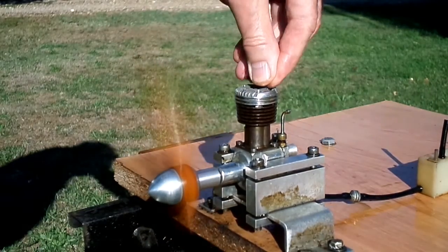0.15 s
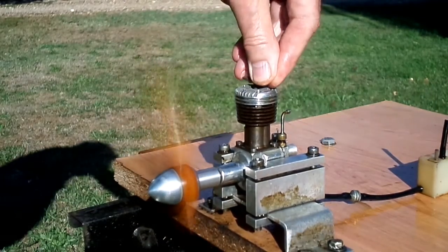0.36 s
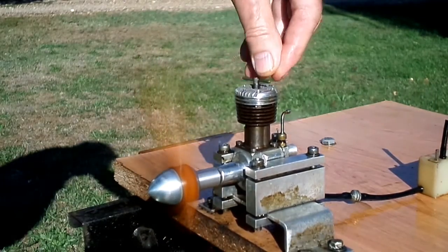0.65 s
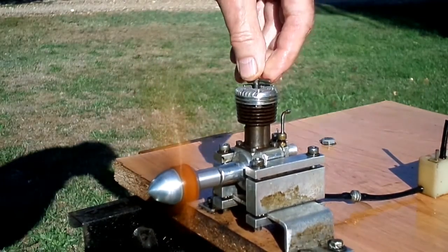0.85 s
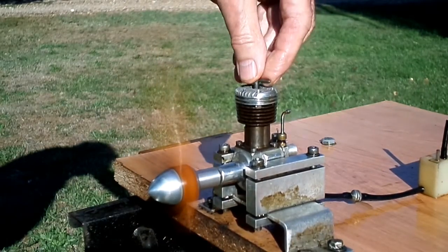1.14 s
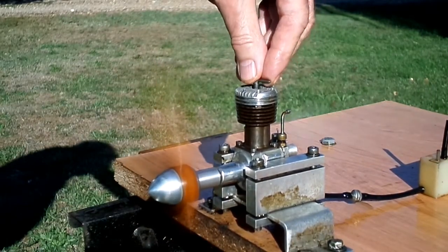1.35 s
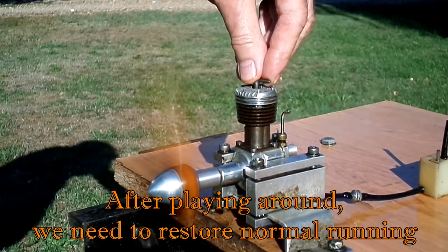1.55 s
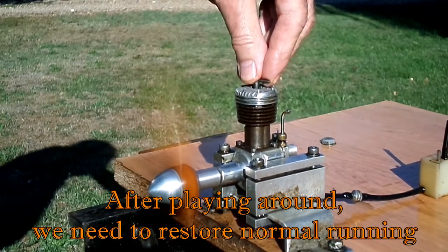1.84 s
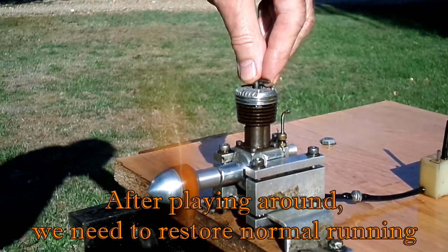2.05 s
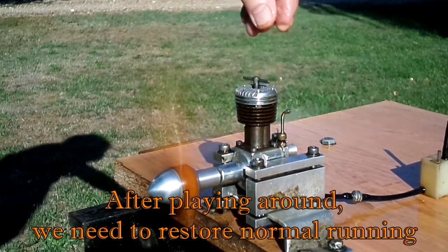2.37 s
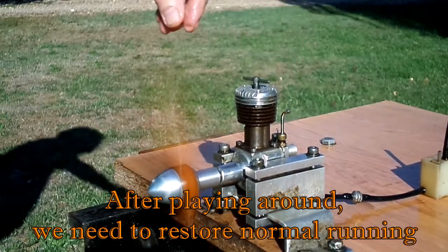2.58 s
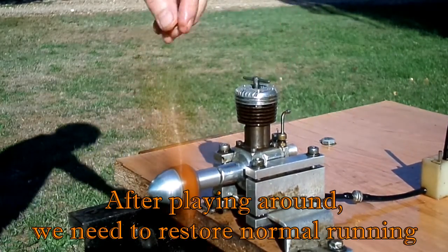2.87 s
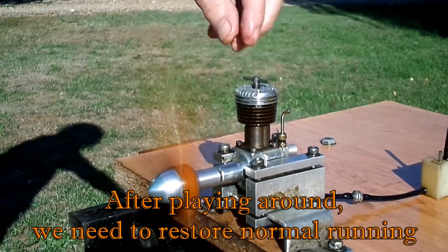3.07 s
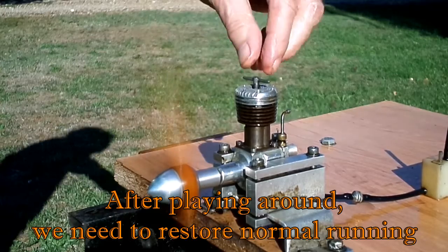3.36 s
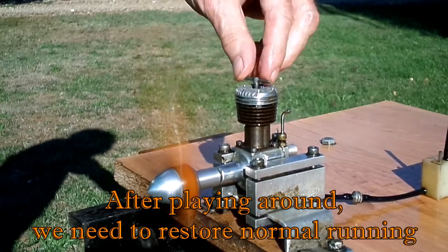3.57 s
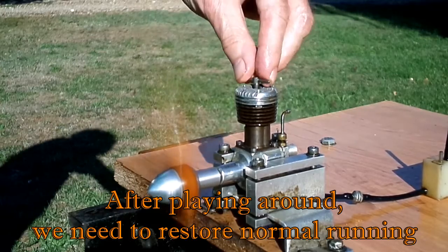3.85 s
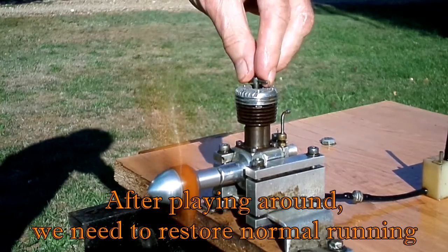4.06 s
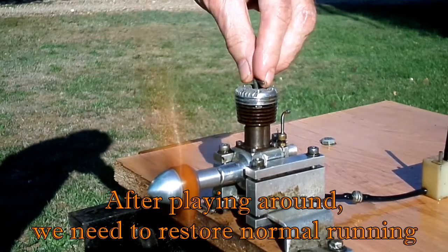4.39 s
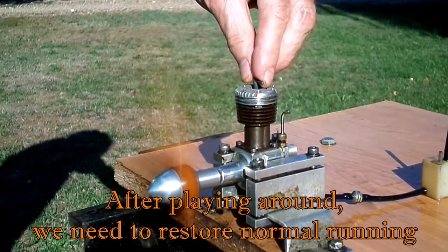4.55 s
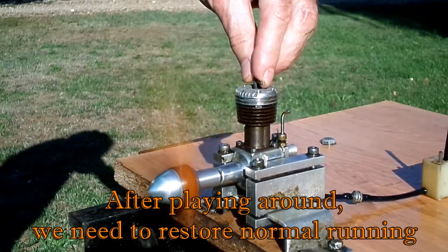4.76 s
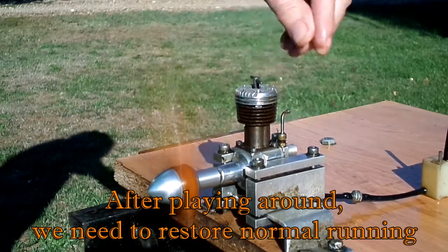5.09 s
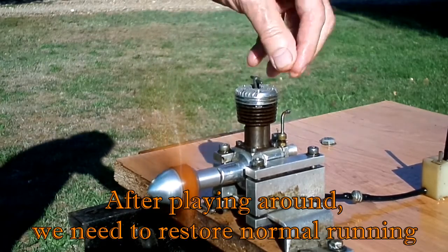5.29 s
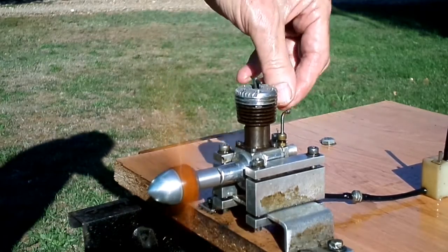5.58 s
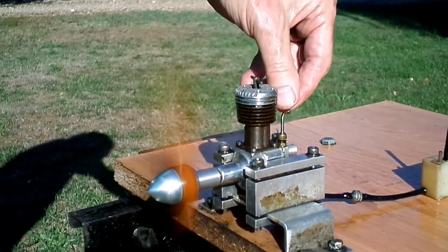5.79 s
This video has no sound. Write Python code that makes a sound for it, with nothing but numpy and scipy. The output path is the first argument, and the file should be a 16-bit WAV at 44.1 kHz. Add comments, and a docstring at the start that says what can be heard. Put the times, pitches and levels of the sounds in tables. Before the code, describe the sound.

Close by in the open air, a little model engine drones with a harsh, rattling buzz and a rush of propeller air. It quickly turns rough, repeatedly missing, sagging and catching with a sharp knock, while its hollow tone shifts slightly. In the last two seconds the stumbling stops and the engine picks up a little speed, running bright and even.

```python
"""A small two-stroke model diesel runs on a bench outdoors while a hand turns its compression screw.
From the start, over the hum and hiss of the propeller, each turn gives a combustion knock, then a sharp
exhaust pop, which the ground and the moving hand reflect. For four seconds the engine burns roughly:
now and then it misses, slows and catches with a hard knock. In the last two it smooths out,
burning cleanly and rising to about 115 turns a second."""
import sys
import numpy as np
from scipy import signal
from scipy.io import wavfile
from scipy.ndimage import map_coordinates

SR = 44100
rng = np.random.default_rng(int(sys.argv[2]) if len(sys.argv) > 2 else 0)


def unload_audio(sound):
    """Save the sound as a 16-bit wav file, at the path given as the first command line argument."""
    columns = np.transpose(np.atleast_2d(sound))
    # keep every value between -1 and 1, then stretch to whole-number steps
    steps = np.round(np.clip(columns, -1, 1) * 32767)
    wavfile.write(sys.argv[1], SR, steps.astype(np.int16))


N = 261513
TIME = np.arange(N) / SR
CRUISE_HZ = 110

# crank speed set by the compression screw, before any misfire: t/s, f/Hz
SET_SPEED = [(0.0, 117.18), (0.121, 117.04), (0.23, 109.59), (0.516, 108.29), (0.699, 112.6),
             (0.875, 103.04), (1.209, 106.76), (1.687, 108.54), (1.985, 105.01), (2.12, 108.14),
             (2.421, 102.61), (2.569, 108.01), (3.124, 108.1), (3.53, 105.71), (4.09, 111.96),
             (4.23, 109.78), (4.442, 112.62), (4.673, 109.45), (4.856, 114.61), (5.097, 116.67),
             (5.263, 113.54), (5.646, 116.54), (5.93, 115.52)]
# how the charge burns: t/s, relative pop level/dB, cleanness (0 rough, 1 hot and clean)
COMBUSTION = [(0, 3.8, .42), (.14, 3.7, .44), (.21, -.3, .08), (.76, -.6, .15), (1.03, .5, 0),
              (1.11, -3.4, 0), (1.26, -.1, .04), (1.89, -.4, .03), (1.97, -5.3, 0), (2.12, -1.2, .08),
              (2.31, -1.7, 0), (2.46, .7, .3), (3.89, 1.1, .33), (4.69, 1.2, .62), (4.97, 2.6, .98),
              (5.24, .6, .85), (5.47, 3.1, .95), (5.93, 2.7, .97)]
# misfires: first weak stroke t/s, catching stroke t/s, deepest loss/dB, extra knock/dB, speed lost/Hz
MISFIRES = [(0.165, 0.201, 5.0, 11.2, 7.52), (0.733, 0.783, 6.6, 6.8, 11.85), (0.833, 0.864, 6.9, 5.2, 6.2),
            (0.875, 0.885, 2, 3, 0.2), (1.052, 1.083, 3.9, 10.4, 8.81), (1.102, 1.112, 2.5, 7, 0.24),
            (1.32, 1.341, 1.6, 0.4, 3.21), (1.444, 1.474, 6.0, 10.3, 7.07), (1.737, 1.747, 4.7, 6.5, 2.29),
            (1.907, 1.936, 3.0, 10.5, 4.04), (2.153, 2.182, 3.5, 3.6, 2.31),
            (2.305, 2.335, 1.4, 11.3, 4.68), (2.365, 2.386, 4.7, 7.8, 5.08), (2.69, 2.7, 1.5, 3, 1.11),
            (2.812, 2.841, 5.2, 5.5, 7.12), (2.945, 2.955, 3.8, 6.5, 1.49), (3.16, 3.189, 4.7, 7.2, 7.77),
            (3.295, 3.305, 1.5, 1.5, 2.4), (3.333, 3.363, 5.6, 6.2, 6.84), (3.479, 3.51, 5.2, 6.4, 7.19),
            (3.549, 3.569, 3.8, 6.8, 3.77), (3.916, 3.934, 4.2, 7.5, 4.68)]
# spectrum of the exhaust jet and of the brightest metal ticks: f/Hz, level/dB
BRIGHT_SPECTRUM = [(1000, -50.5), (5000, -18.5), (8000, -1.5), (10000, 0), (11600, 7.5), (13000, -2),
                   (15500, -16)]
# level law of hiss and knock: cruising level/dB, slope/(dB/Hz), dB per dB of pop level
NOISE_LAW = (-25.35, .08, .68)


def amp(db):
    """Amplitude ratio of a level: tenfold for every 20 dB."""
    return 10 ** (np.asarray(db) / 20)


def unit_rms(x):
    """Normalisation to a mean power of 1."""
    return x / np.sqrt(np.mean(x ** 2) + 1e-20)


def curves(table, t):
    """Linear interpolation of a table's columns at the times t."""
    knots, *columns = np.transpose(table)
    return [np.interp(t, knots, column) for column in columns]


def waver(hz):
    """Slow random modulation of rms 1, mostly below hz."""
    knots = np.arange(0, N / SR + 1, 1 / (2 * hz))
    return unit_rms(np.interp(TIME, knots, rng.standard_normal(len(knots))))


def colour(x, spectrum, peaks=(), size=4096):
    """Minimum-phase filter: a broad spectrum with Lorentzian peaks and dips on top."""
    hz = abs(np.fft.fftfreq(size, 1 / SR))
    spectrum_hz, spectrum_db = np.transpose(spectrum)
    gain = amp(np.interp(np.log(hz + 1), np.log(spectrum_hz), spectrum_db))
    for centre_hz, width_hz, peak_db in peaks:
        gain = gain * amp(peak_db / (1 + (2 * (hz - centre_hz) / width_hz) ** 2))
    response = np.exp(signal.hilbert(np.log(gain)).conj())
    taps = np.fft.ifft(response).real
    return signal.oaconvolve(x, taps[:size // 2])[:N]


def lowpass(x, hz, order=1):
    """Low-pass roll-off: about 6 dB an octave for each order."""
    return signal.sosfilt(signal.butter(order, hz, fs=SR, output="sos"), x)


def linger(x, hz, width_hz):
    """All-pass group delay: the band around hz arrives late, like a resonance building up."""
    radius = np.exp(-np.pi * width_hz / SR)
    poles = [1, -2 * radius * np.cos(2 * np.pi * hz / SR), radius ** 2]
    return signal.lfilter(poles[::-1], poles, x)


def delayed(x, ms):
    """Propagation delay along a fixed or changing path."""
    return map_coordinates(x, [np.arange(N) - ms * SR / 1000], order=3)


def clicks(times, sizes, reach=12):
    """Band-limited impulses: a windowed sinc at each exact time."""
    index = np.round(times * SR).astype(int)[:, None] + np.arange(-reach, reach + 1)
    offset = index - times[:, None] * SR
    window = np.cos(np.pi * offset / (2 * reach + 2)) ** 2
    pulses = sizes[:, None] * np.sinc(offset) * window
    inside = (index >= 0) & (index < N)
    return np.bincount(index[inside], pulses[inside], N)


def bursts(times, relative_db, decay_s, spectrum):
    """Amplitude-modulated noise: a coloured puff at each time, the whole train at rms 1."""
    age = np.arange(SR // 50) / SR / decay_s
    envelope = signal.oaconvolve(clicks(times, amp(relative_db)), age * np.exp(-age))[:N]
    return unit_rms(colour(envelope * rng.standard_normal(N), spectrum))


def crank_speed(t, recovery_s=.0594):
    """Inertia: the turns per second sag through a misfire, then relax back to the set speed."""
    speed = curves(SET_SPEED, t)[0]
    for start, catch, _, _, lost_hz in MISFIRES:
        sag = np.interp(t, [start, catch], [0, 1])
        recovery = np.exp(-np.maximum(t - catch, 0) / recovery_s)
        speed = speed - lost_hz * sag * recovery
    return speed


def level_db(law, t):
    """Radiated level grows with crank speed and with the strength of the firing."""
    cruise_db, db_per_hz, share = law
    return cruise_db + db_per_hz * (crank_speed(t) - CRUISE_HZ) + share * curves(COMBUSTION, t)[0]


def strokes(turns):
    """Two-stroke cycle: a port opening each turn, its misfire loss and its extra knock on catching."""
    times = np.interp(np.arange(1, int(turns[-1]) + 1), turns, TIME)
    loss_db, knock_db = np.zeros((2, len(times)))
    for start, catch, depth_db, hard_db, _ in MISFIRES:
        first, last = abs(times - start).argmin(), abs(times - catch).argmin()
        progress = np.linspace(0, 1, last - first + 2)[1:-1]
        loss_db[first:last] = depth_db * np.sin(np.pi * progress ** 1.02) ** .23
        knock_db[last] = hard_db
    return times, loss_db, knock_db


def propeller(turns, loss_db):
    """Rotational noise: the shaft shakes once a turn, two blades beat the air, and their rush throbs."""
    # blade harmonics: multiple of the crank speed, relative level/dB
    harmonics = [(2, -1.5), (3, -15.5), (4, -11.5), (6, -19)]
    # spectrum of the rushing air: f/Hz, level/dB
    rush_spectrum = [(25, -17), (70, -12), (150, -7), (400, -8), (1000, -6), (2000, -8), (2700, -7),
                     (3600, -2), (5000, -3), (6800, -6), (9500, -1.5), (11500, 2), (13000, -3), (15500, -9)]
    hum_law, blade_law = (-38.4, .27, .72), (-31.8, .3, .66)  # terms as in NOISE_LAW
    hum_db = level_db(hum_law, TIME) + .8 * waver(hz=14)
    blade_db = level_db(blade_law, TIME) + .8 * waver(hz=14)
    hiss_db = level_db(NOISE_LAW, TIME) - .74 - .32 * loss_db  # sags while the engine misses
    angle = 2 * np.pi * turns
    hum = np.sqrt(2) * np.sin(angle)
    blades = np.sqrt(2) * sum(amp(db) * np.cos(k * angle) for k, db in harmonics)
    throb = 1 + .05 * np.cos(2 * angle)
    rush = unit_rms(colour(rng.standard_normal(N), rush_spectrum) * throb)
    return amp(hum_db) * hum + amp(blade_db) * blades + amp(hiss_db) * rush


def knock(times, loss_db, knock_db):
    """Impact excitation: ignition rattles the metal before the ports open; two lighter rattles follow."""
    # spectrum of the rattling metal: f/Hz, level/dB
    clatter = [(200, -28), (900, -17), (2300, -11), (3400, -2), (4700, 0), (7000, -8), (9500, -8),
               (11500, -4), (15500, -16)]
    scatter = rng.standard_normal((len(times), 3)).T
    db = level_db(NOISE_LAW, times) - 1.5 * loss_db
    ignition = bursts(times - .0027, db + 1.5 * scatter[0], decay_s=.00045, spectrum=clatter)
    slap = bursts(times - .0016, db + .88 * scatter[1], decay_s=.00053, spectrum=clatter)
    late = bursts(times + .0016, db + 3.5 * scatter[2], decay_s=.0003, spectrum=BRIGHT_SPECTRUM)
    rattles = amp(-34) * ignition + amp(-37) * slap + amp(-36) * late
    # fuel left by a misfire detonates early, with a rattle and a bright tick
    caught = knock_db > 0
    detonation = bursts(times[caught] - .003, knock_db[caught], decay_s=.00048, spectrum=clatter)
    tick = bursts(times[caught] - .0025, knock_db[caught], decay_s=.00026, spectrum=BRIGHT_SPECTRUM)
    return rattles + amp(-42) * detonation + amp(-49.5) * tick


def reflections(ports):
    """Comb filtering: dull echoes off the moving hand and the ground interfere with the direct sound."""
    # echo off the hand: t/s, delay/ms, amplitude ratio
    hand_path = [(0, 1.12, .3), (.28, 1.17, .1), (1.14, 1.31, .25), (2.11, 1.34, .22), (2.29, 1.49, .34),
                 (2.42, 1.59, .78), (2.55, 1.7, .72), (2.7, 1.96, .5), (3.04, 2.01, .35), (3.3, 1.69, .6),
                 (3.62, 1.605, .53), (4.12, 1.69, .49), (4.66, 1.71, .41), (5, 1.68, .19), (5.5, 1.56, .14),
                 (5.93, 1.95, .1)]
    hand_ms, strength = curves(hand_path, TIME)
    filter_lag_ms = .07
    hand = strength * delayed(lowpass(ports, hz=3060, order=2), hand_ms - filter_lag_ms)
    ground = .85 * delayed(lowpass(ports, hz=284), ms=3.844)
    return hand + ground


def exhaust_jet(times, loss_db):
    """Turbulence: gas tears through the ports just after each pop; rough burning adds a lower rasp."""
    # spectrum of rough burning: f/Hz, level/dB
    rasp_spectrum = [(200, -25), (600, -3.5), (1500, 3.5), (2600, -2), (3500, 8), (4600, 2.5), (6500, -13),
                     (15000, -10)]
    power_db, clean = curves(COMBUSTION, times)
    fizz, grit = rng.standard_normal((2, len(times)))
    tearing_db = power_db - 1.2 * loss_db + 4 * np.minimum(fizz, 1.5)
    rasp_db = power_db - 1.1 * loss_db - 7 * clean + 1.5 * grit
    tearing = bursts(times + .00017, tearing_db, decay_s=.00016, spectrum=BRIGHT_SPECTRUM)
    rasp = bursts(times, rasp_db, decay_s=.00058, spectrum=rasp_spectrum)
    return amp(-33) * tearing + amp(-30.8) * rasp


def exhaust_pops(times, loss_db, knock_db):
    """Impulse response: each port opening frees a steep pressure pulse with a brief, hollow ring."""
    # spectrum of one pop: f/Hz, level/dB
    pop_spectrum = [(60, -41), (250, -12), (420, -1), (520, 0.5), (750, 1.5), (1200, 0.5), (2000, -1),
                    (2700, -7.5), (3300, 0), (4200, -11), (5300, -11), (6500, -22.5), (15000, -33)]
    # peaks and dips of the pop's hollow tone while burning rough, including colouring from the
    # nearby hand: f/Hz, width/Hz, level/dB
    rough_peaks = [(652, 72, -11), (923, 160, 8), (1563, 300, 7.5), (1782, 30, -39), (2178, 150, 10.5),
                   (2560, 64, 5.5), (2890, 110, 9.5), (3527, 480, 12), (4540, 190, 3.5)]
    # peaks and dips of its tone while burning clean: f/Hz, width/Hz, level/dB
    clean_peaks = [(457, 66, 4.5), (550, 130, -0.5), (755, 100, 9), (1057, 30, 7.5), (1422, 51, 19),
                   (1892, 65, 9), (2375, 216, 12), (2840, 300, 0.5), (3707, 550, 11.5)]
    scatter, jitter = rng.standard_normal((len(times), 2)).T
    power_db, clean = curves(COMBUSTION, times)
    unsteady = 1 - .65 * clean
    size = amp(power_db - loss_db - .02 * knock_db + .85 * unsteady * scatter)
    onsets = times + 1.5e-5 * unsteady * jitter
    # the low thump thins at a higher set speed and on weak strokes; a catching stroke has more
    excess_hz = curves(SET_SPEED, times)[0] - CRUISE_HZ
    thump_db = -.8 - .56 * excess_hz - 4.1 * loss_db + .62 * knock_db
    extra_bass = amp(thump_db) - 1
    pops = 0
    for share, peaks in ((1 - clean, rough_peaks), (clean, clean_peaks)):
        pulses = clicks(onsets, share * size)
        thump = lowpass(clicks(onsets, share * size * extra_bass), hz=960)
        pops = pops + colour(pulses + thump, pop_spectrum, peaks)
    return amp(-20.5) * unit_rms(linger(pops, hz=2690, width_hz=160))


def scene():
    """Superposition of propeller, knock, echoes and exhaust, all timed by one crank."""
    start_turn = .78
    wander = .0016 * waver(hz=9)  # uneven burning lets the crank run slightly ahead and behind
    turns = start_turn + np.cumsum(crank_speed(TIME)) / SR + wander
    times, loss_db, knock_db = strokes(turns)
    ports = exhaust_pops(times, loss_db, knock_db) + exhaust_jet(times, loss_db)
    air = propeller(turns, np.interp(TIME, times, loss_db))
    metal = knock(times, loss_db, knock_db)
    return (air + metal + reflections(ports) + ports)[None]


def record(dry, edge_hz=15550):
    """Band limiting: a steep linear-phase low-pass removes the highest treble."""
    taps = signal.firwin(511, edge_hz, window=("kaiser", 9), fs=SR)
    return signal.oaconvolve(dry, taps[None], "same")


dry = scene()
out = record(dry)
unload_audio(out)
```